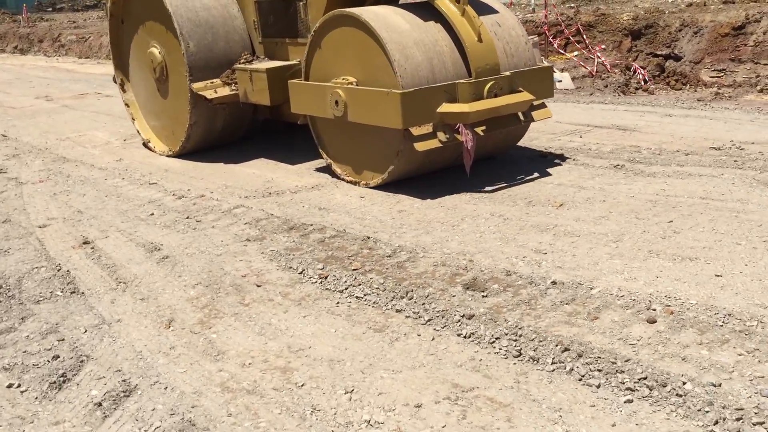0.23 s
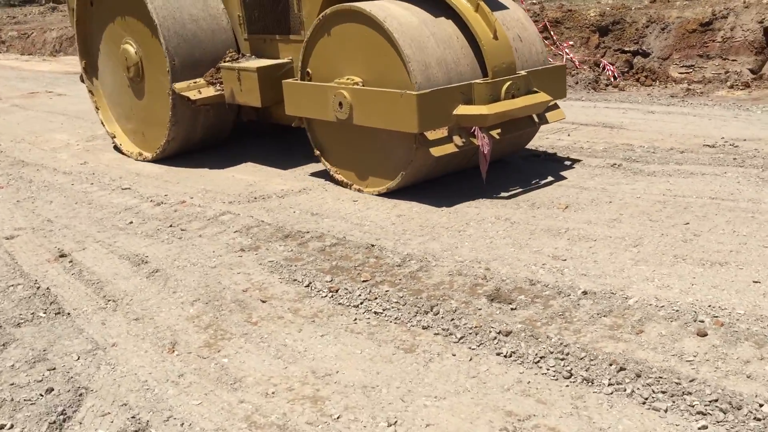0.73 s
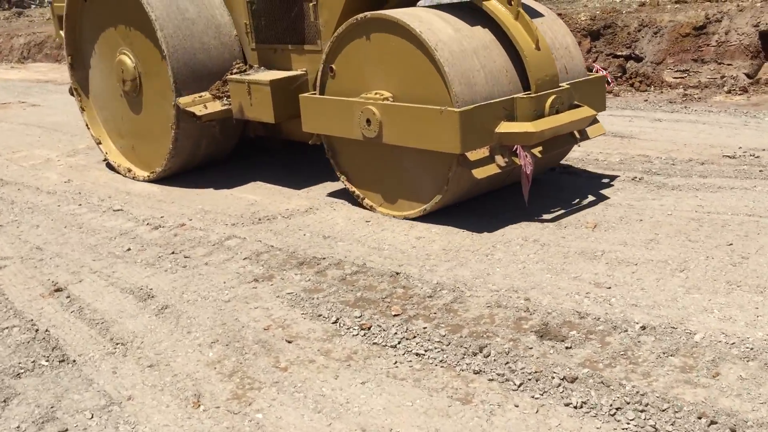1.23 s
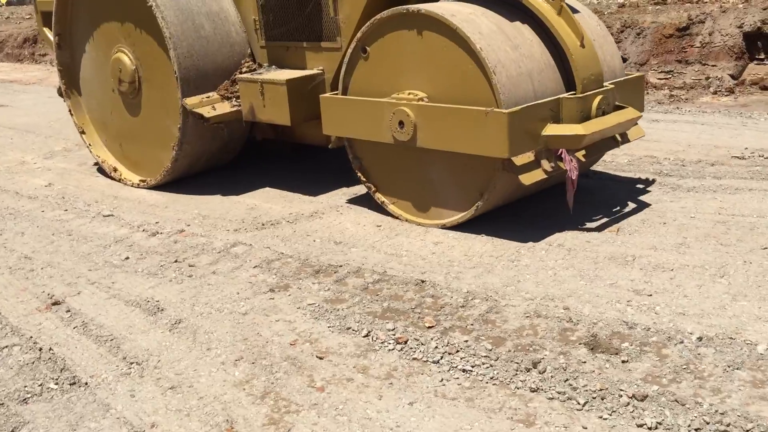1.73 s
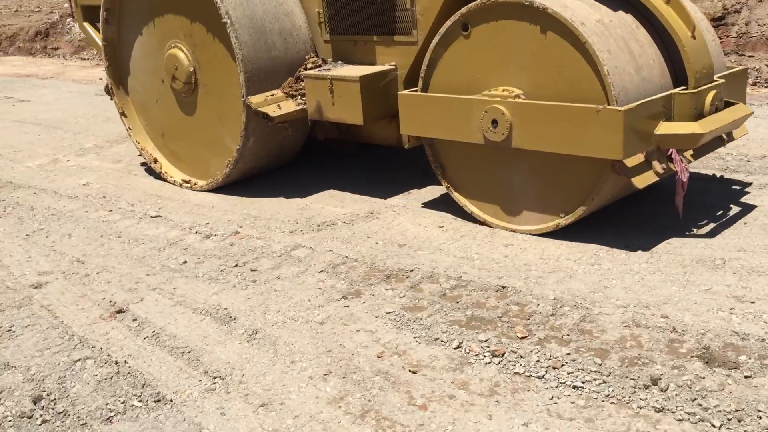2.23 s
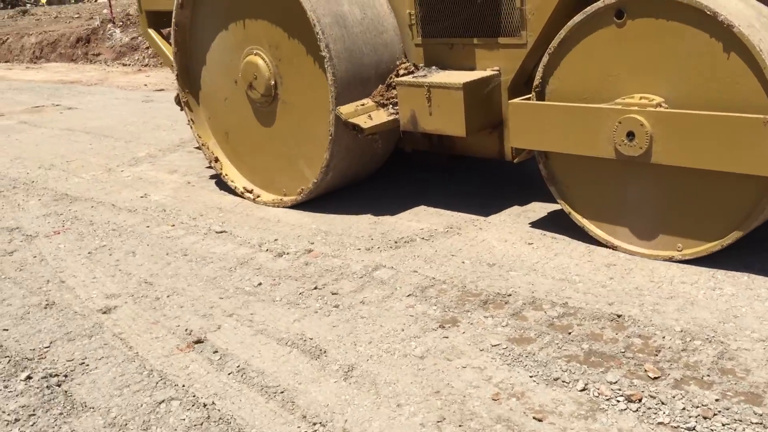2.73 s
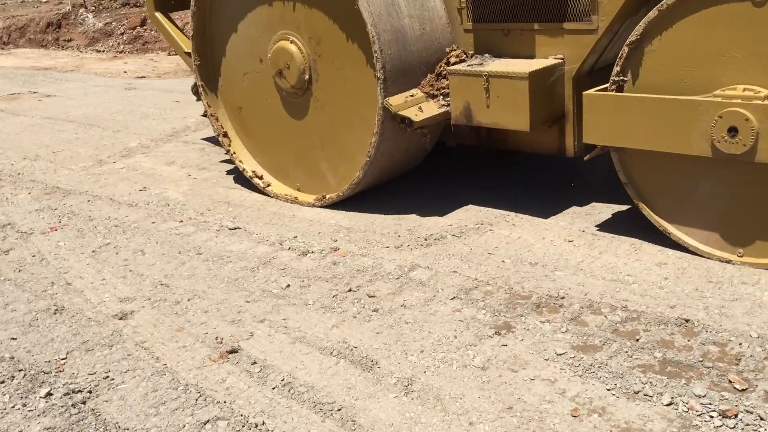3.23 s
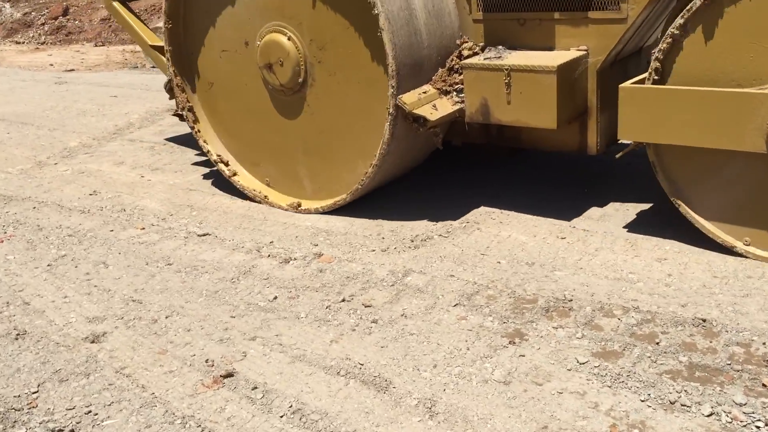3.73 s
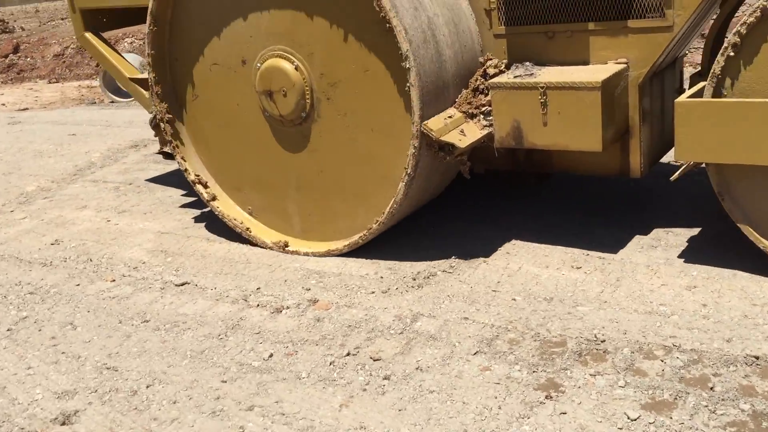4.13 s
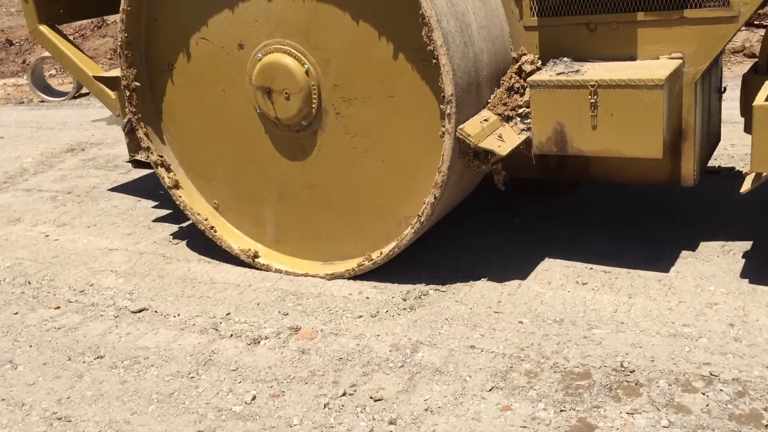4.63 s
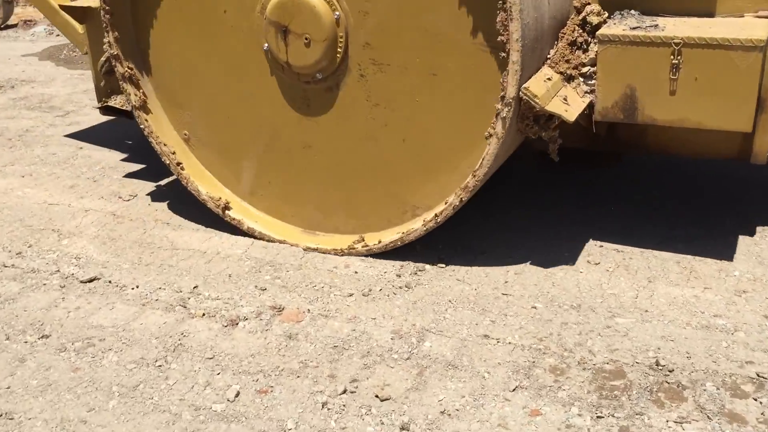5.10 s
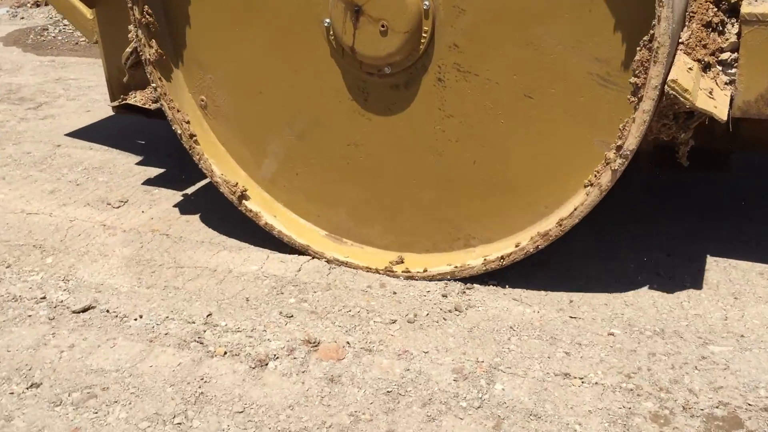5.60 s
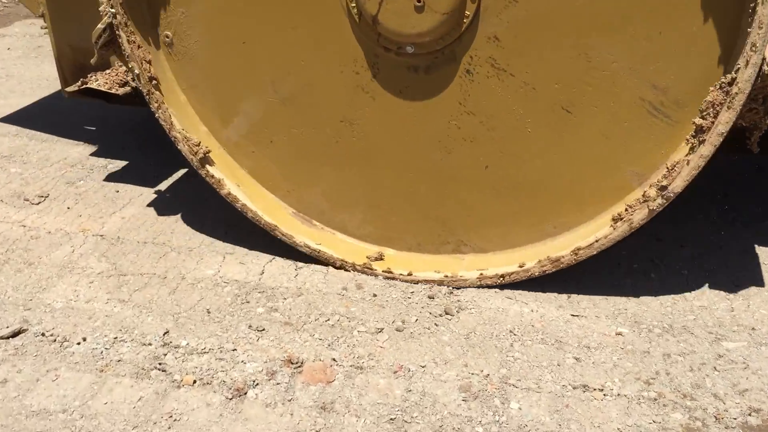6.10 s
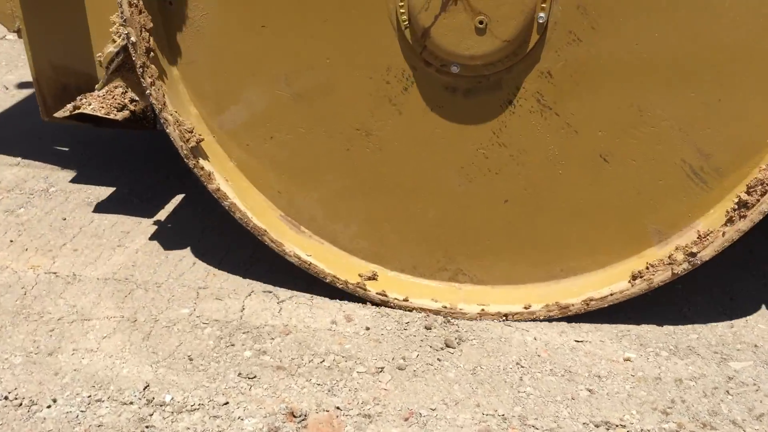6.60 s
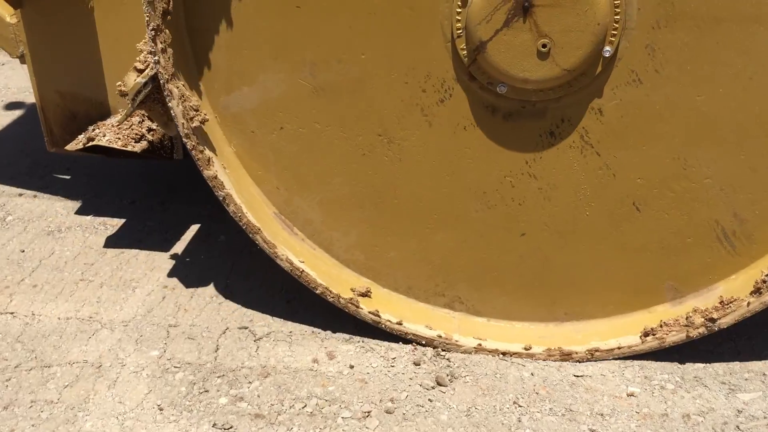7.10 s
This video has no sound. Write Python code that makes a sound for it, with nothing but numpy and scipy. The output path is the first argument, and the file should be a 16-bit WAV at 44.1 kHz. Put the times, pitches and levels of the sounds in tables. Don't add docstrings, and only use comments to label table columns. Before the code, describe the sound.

A heavy four-cylinder diesel drones continuously in the open, first at some distance, then nearer. Midway it surges to a faster, higher hum with a brief wavering at the top. From there it holds steady, louder and rougher, with hard combustion clatter, airy hiss, singing gears and hydraulic whine, while steel drums grind the ground beneath. The microphone stays put and ends very near the machine.

```python
import sys
import numpy as np
from scipy import signal
from scipy.fft import rfft, irfft, next_fast_len
from scipy.io import wavfile
from scipy.ndimage import uniform_filter1d, map_coordinates

SR = 44100
rng = np.random.default_rng(int(sys.argv[2]) if len(sys.argv) > 2 else 0)


def bounce(signal):
    frames = np.transpose(np.atleast_2d(signal))
    limited = np.clip(frames, -1, 1)
    pcm = np.round(limited * 32767).astype(np.int16)
    wavfile.write(sys.argv[1], SR, pcm)


def volts_from_db(level):
    exponent = np.asarray(level, float) / 20
    return 10 ** exponent


N = 324135

# (time [s], firing rate [Hz])
CRANK_SPEED = [(0, 46.2), (1.55, 46.1), (2.25, 46.22), (2.89, 46.18), (2.96, 46.69), (3.03, 48.49),
               (3.17, 53.48), (3.24, 55.55), (3.3, 55.7), (3.37, 54.4), (3.44, 53.85), (3.52, 54),
               (3.61, 54.6), (3.73, 54.38), (4.15, 54.27), (5.05, 54.27), (7.35, 54.65)]


def firing_rate():
    return curves(CRANK_SPEED)[0]


def crankshaft():
    return 0.15 + np.cumsum(firing_rate()) / SR


def fast():
    return np.clip((firing_rate() - 47) / 5, 0, 1)


# (time [s], extra fuel [-1 to 1])
GOVERNOR_FUEL = [
    (2.75, -0.2),
    (2.95, 0.42),
    (3.07, 0.74),
    (3.17, 1.07),
    (3.24, 0.39),
    (3.31, -0.6),
    (3.4, 0.088),
    (3.5, 0.62),
    (3.62, 0.065),
]


def extra_fuel():
    return curves(GOVERNOR_FUEL)[0]


# (time [s], engine bay level [dB], tailpipe end level [dB])
DISTANCE = [
    (0, 0.5, 0),
    (1, 2.5, 1.5),
    (2, 4, 2.5),
    (2.7, 5.5, 3),
    (3.75, 8.5, 4),
    (4.5, 10.5, 5.5),
    (5.4, 12, 7),
    (6.2, 12, 10),
    (7, 11, 11),
    (7.35, 9.5, 10.5),
]


def approach():
    return curves(DISTANCE)


# (low-speed level [dB], its approach slope [dB/dB], high-speed level [dB],
# its approach slope [dB/dB], fuel gain [dB per unit fuel])
EXHAUST_LAWS = [
    (-24, 0.35, -20, 0.293, 3.5),
    (-26, 0.93, -27, 0.0371, 2.5),
    (-44, 2.1, -47, 1.34, 5),
    (-46.5, -1.46, -44, 0.92, 3),
]


def order_levels(hz):
    bay_db, tail_db = approach()
    pipe_lag_s = 0.057
    fuel = np.roll(extra_fuel(), int(pipe_lag_s * SR))
    high = fast()
    levels = []
    for law, near_db in zip(EXHAUST_LAWS, (bay_db, bay_db, tail_db, bay_db)):
        low_db, low_slope, high_db, high_slope, fuel_db = law
        at_low_db = low_db + low_slope * near_db
        at_high_db = high_db + high_slope * near_db
        levels.append(at_low_db + high * (at_high_db - at_low_db) + fuel_db * fuel)
    one, two, three, five = levels
    null_db = -5 * np.exp(-((hz - 49.1) / 2.06) ** 2)
    return one, two + null_db, three + 2 * null_db, five


def exhaust(firing):
    hz = firing_rate()
    one_db, two_db, three_db, five_db = order_levels(hz)
    flip = np.pi * np.clip((51 - hz) / 4, 0, 1)
    lean = np.interp(np.arange(N) / SR, (0, 2.8, 3.5, 7.3), (0.6, 0.2, -0.2, 1.3))
    angle = 2 * np.pi * firing
    tone = volts_from_db(one_db + 0.14 * wobble(25)) * np.cos(angle)
    tone += volts_from_db(two_db + 0.21 * wobble(20)) * np.cos(2 * angle - flip + lean)
    tone += volts_from_db(three_db + wobble(12)) * np.cos(3 * angle - flip + lean - 0.8)
    tone += volts_from_db(five_db - 2.5 + wobble(8.8)) * np.cos(4 * angle + np.pi + lean / 2)
    tone += volts_from_db(five_db + wobble(10)) * np.cos(5 * angle + 2 * lean)
    for order, db in ((1.75, -6.5), (3.75, -19), (4.25, -14.5), (4.5, -10), (4.75, -10.5), (5.25, -4.5), (5.5, -32)):
        size = volts_from_db(five_db + db + 2.5 * wobble(4.3))
        tone += size * np.cos(order * angle + wobble(1.557))
    tone += volts_from_db(two_db - 21 + 2 * wobble(3)) * np.cos(2.75 * angle)
    return np.sqrt(2) * tone


# (far level [dB], approach slope [dB/dB], fuel gain [dB per unit fuel])
PART_LAWS = [
    (-40.5, 0.98, 11),
    (-32, 0.5872, 3.5),
    (-43.5, 1.0084, 2),
    (-50.5, 0.7744, 4),
]


def block_levels():
    bay_db, tail_db = approach()
    fuel = extra_fuel()
    return [far_db + slope * near_db + fuel_db * fuel
            for (far_db, slope, fuel_db), near_db in zip(PART_LAWS, (tail_db, bay_db, bay_db, bay_db))]


def block(firing):
    rumble_db, casing_db, knock_db, hiss_db = block_levels()
    t = np.arange(N) / SR
    burn = firing + 4 - 0.45 + 0.3 * fast()
    effort = 1 + 1.2 * np.exp(-((t - 3.08) / 0.14) ** 2)
    load_db = 0.32 * wobble(6.1)
    knock_gate = bursts(burn, 0.73 * effort, 0.4, (0.19, 0.93, 0.13, 1.5), scatter_db=1.9)
    hiss_gate = knock_gate * bursts(burn, 0.5 * effort, 0.19, (0, 0, 0, 0.4), scatter_db=1.0)
    out = volts_from_db(rumble_db - 2.5) * rumble(firing)
    out += volts_from_db(casing_db + load_db) * casing(firing, burn, effort)
    out += volts_from_db(knock_db + load_db) * knock(firing, knock_gate)
    out += volts_from_db(hiss_db + load_db) * hiss(hiss_gate)
    return out


# (frequency [Hz], level [dB per Hz])
FAR_PANELS = [(180, -47), (300, -7.5), (450, -8), (600, 0.5), (700, -2.5), (870, -6.5), (1300, -2),
              (1600, -5.5), (1900, -7), (2300, -12.5), (3000, -17), (3900, -50)]
# (frequency [Hz], level [dB per Hz])
NEAR_PANELS = [(180, -48), (300, -6), (500, -9.5), (650, -7), (780, -5), (950, -6.5), (1300, -4.5),
               (1550, -5), (2000, -7), (2400, -11.5), (3000, -15), (3900, -51)]


def casing(firing, burn, effort):
    near = np.clip((np.arange(N) / SR - 2.6) / 0.45, 0, 1)
    depth = (0.95 - 0.55 * near) * effort ** 0.75
    shake = rattle(firing, locked=0.6, drift_s=0.8)
    shake = shake * bursts(burn, depth, 0.24, (0, 2.5, -2.5, 1), scatter_db=1.2)
    shake = patchy(shake, depth_db=1.2)
    return (1 - near) * coloured(shake, FAR_PANELS) + near * coloured(shake, NEAR_PANELS)


# (frequency [Hz], level [dB per Hz])
RUMBLE_COLOUR = [(40, -30), (120, -15), (200, -2), (275, 0), (330, -6.5), (420, -4.5), (600, -24)]


def rumble(firing):
    return coloured(rattle(firing, locked=0.44, drift_s=0.684), RUMBLE_COLOUR)


# (frequency [Hz], level [dB per Hz])
KNOCK_COLOUR = [(1410, -70), (2400, -0.5), (2880, -6.5), (3120, -5), (3330, -6.5), (4500, -9),
                (4880, -11.5), (6190, -9.5), (8000, -19), (10400, -28), (17600, -120)]


def knock(firing, gate):
    clatter = patchy(rattle(firing, locked=0.26, drift_s=0.394), depth_db=1.16)
    return coloured(clatter * gate, KNOCK_COLOUR)


# (frequency [Hz], level [dB per Hz])
HISS_COLOUR = [(4120, -37), (7000, -5), (7870, -9), (9090, -5), (10600, -9), (12700, -8.5), (14700, -13),
               (15300, -10)]


def hiss(gate):
    return coloured(patchy(rng.standard_normal(N), depth_db=1.3) * gate, HISS_COLOUR)


# (order [per firing], time [s], half length [s], level [dB])
PANEL_FLARES = [(6, 4.2, .6, -43), (12, 1.6, 1.1, -43.5), (13, 2.1, .8, -44), (13, 5.9, .6, -40),
                (15, .8, .5, -45), (14.5, 5.2, .6, -40), (21, 6.1, .5, -40), (22.5, 5.2, .35, -38),
                (23.25, 6.5, .5, -42), (24.25, 6.3, .5, -41), (27, 4.8, .5, -42), (27, 6.8, .6, -42),
                (28.25, 5, .5, -41), (29.25, 4.4, .4, -41), (32, 5.2, .4, -43), (40.5, 1.2, 1.1, -46),
                (41.5, 2.1, .3, -46), (42, 5.4, .4, -40.5), (41.5, 6.2, .6, -46), (42.5, 2.98, .04, -39)]


def panels(firing, boost_db):
    t, out = np.arange(N) / SR, np.zeros(N)
    unsteady, blur = wobble(14), wobble(9)
    for order, s, half, db in PANEL_FLARES:
        part = np.abs(t - s) < 2 * half
        swell_db = db + boost_db - 6 * ((t[part] - s) / half) ** 4
        swell_db += 1.5 * np.roll(unsteady, int(order * 9000))[part]
        phase = 2 * np.pi * order * firing[part] + 0.4 * np.roll(blur, int(order * 7000))[part]
        out[part] += volts_from_db(swell_db) * np.cos(phase)
    return np.sqrt(2) * out


# (order [per firing], level at low speed [dB], level at high speed [dB])
PUMP_LINES = [(9, -44.5, -48), (13.5, -48.5, -40), (18, -48, -44)]


def pump(firing):
    return whine(firing, PUMP_LINES, blur=0.2)


# (order [per firing], level at low speed [dB], level at high speed [dB])
GEAR_LINES = [(28, -46, -41), (14, -49, -46), (11, -57, -46)]


def gears(firing):
    each_firing = 0.3 * np.cos(2 * np.pi * (firing - 0.67 + 0.27 * fast()))
    hardest = 0.55 * np.cos(np.pi * (firing - 2.4) / 4) ** 24
    return whine(firing, GEAR_LINES, blur=0.25) * (0.92 + each_firing + hardest)


# (order [per firing], time [s], half length [s], level [dB])
FRAME_OPENINGS = [(9, 2.7, 1.7, -44.5), (9, 3.4, .3, -41), (9, 4.1, .4, -43), (13.5, 3.8, .7, -36.5),
                  (18, 4.3, .5, -35), (18, 6.15, .2, -39), (18, 6.75, .2, -41), (28, 2.5, .55, -41),
                  (28, 4.4, .7, -31), (28, 6.6, 1.1, -35.5), (28, 6.9, .4, -38), (14, 2.2, .75, -45),
                  (14, 6.2, 1.2, -43.5), (11, 3.8, .6, -41), (11, 5.05, .3, -42.5), (11, 7, .4, -40)]


def whine(firing, rows, blur):
    t, out = np.arange(0, N / SR, 0.01), np.zeros(N)
    high = np.interp(t, np.arange(N) / SR, fast())
    for k, low_db, high_db in rows:
        power = volts_from_db(2 * (low_db + (high_db - low_db) * high))
        for order, s, half, db in FRAME_OPENINGS:
            if order == k:
                power += volts_from_db(2 * db - 12 * ((t - s) / half) ** 4)
        size, = curves(np.c_[t, np.sqrt(2 * power)])
        out += size * volts_from_db(wobble(14)) * np.cos(2 * np.pi * k * firing + blur * wobble(9))
    return out


# (time [s], level [dB])
DRUM_LEVEL = [
    (0, -33.5),
    (1.5, -37.5),
    (2.8, -34),
    (3.2, -36),
    (4, -35.5),
    (5.5, -32.5),
    (7.35, -32),
]
# (frequency [Hz], level [dB per Hz])
SOIL_COLOUR = [(6, -12), (30, 6), (70, 5.5), (130, -1.5), (200, -1), (260, -11), (400, -35)]


def drums():
    level_db = curves(DRUM_LEVEL)[0] + 1.4 * wobble(6.2)
    return volts_from_db(level_db) * coloured(rng.standard_normal(N), SOIL_COLOUR)


def rattle(firing, locked, drift_s):
    steps = 2048
    slow = np.arange(N) / SR / drift_s
    patterns = rng.standard_normal((64, steps))
    step = (firing / 4 % 1 * steps).astype(int)
    k = slow.astype(int) % 63
    turn = np.pi / 2 * (slow % 1)
    repeating = np.cos(turn) * patterns[k, step] + np.sin(turn) * patterns[k + 1, step]
    share = np.clip(locked, 0, 1)
    return np.sqrt(share) * repeating + np.sqrt(1 - share) * rng.standard_normal(N)


def bursts(firing, depth, fall, cylinders_db, scatter_db):
    count = firing.astype(int)
    scatter = scatter_db * rng.standard_normal(count[-1] + 1)
    size_db = np.asarray(cylinders_db)[count % 4] + scatter[count]
    gate = depth * volts_from_db(size_db) * np.exp(-(firing % 1) / fall)
    return unit(1 + uniform_filter1d(gate, size=170))


def patchy(x, depth_db):
    z = signal.stft(x, nperseg=1024)[2]
    field = uniform_filter1d(rng.standard_normal(z.shape), size=5, axis=0)
    field = uniform_filter1d(field, size=30, axis=1)
    return unit(signal.istft(z * volts_from_db(depth_db * unit(field)), nperseg=1024)[1][:N])


def coloured(x, points):
    m = next_fast_len(N + 8192)
    hz, db = np.transpose(points)
    gain = volts_from_db(np.interp(np.log(np.fft.rfftfreq(m, 1 / SR) + 1), np.log(hz + 1), db, -120, -120))
    return unit(irfft(rfft(x, m) * gain, m)[:N])


def wobble(rate):
    knots = rng.standard_normal(int(N * rate / SR) + 4)
    return map_coordinates(knots, [np.arange(N) * rate / SR])


def curves(rows):
    s, *cols = np.transpose(rows)
    return [np.interp(np.arange(N) / SR, s, c) for c in cols]


def unit(x):
    return x / np.sqrt(np.mean(x ** 2) + 1e-20)


def scene():
    firing = crankshaft()
    engine = exhaust(firing) + block(firing) + panels(firing, boost_db=1.0)
    return (engine + pump(firing) + gears(firing) + drums())[None]


def band_limit(x):
    return signal.sosfilt(signal.butter(12, 15430, fs=SR, output="sos"), x)


def record(dry):
    m = next_fast_len(N + 8192)
    hz = np.fft.rfftfreq(m, 1 / SR)
    port_dip = volts_from_db(-4 * np.exp(-((hz - 10450) / 260) ** 2))
    low_cut = hz ** 4 / (hz ** 4 + 30 ** 4)
    heard = irfft(rfft(dry, m) * port_dip * low_cut, m)[:, :N]
    soft = heard / (1 + np.abs(heard / 0.56) ** 5) ** (1 / 5)
    return band_limit(soft)


dry = scene()
out = record(dry)
bounce(out)
```